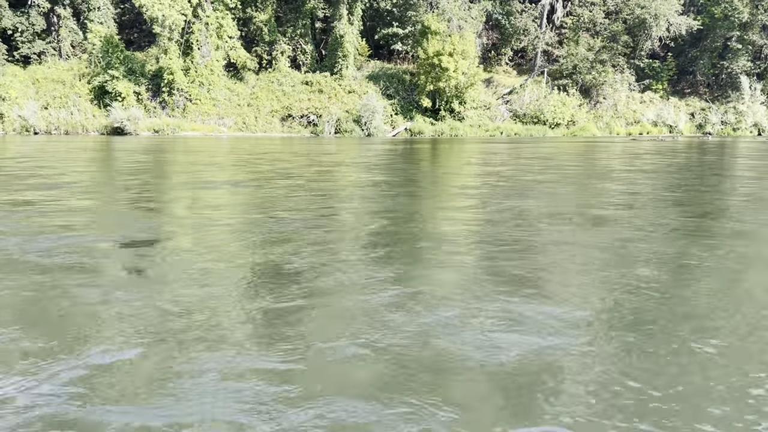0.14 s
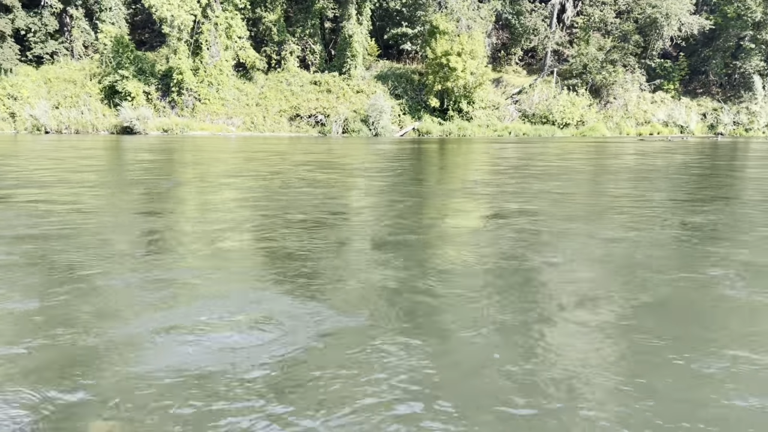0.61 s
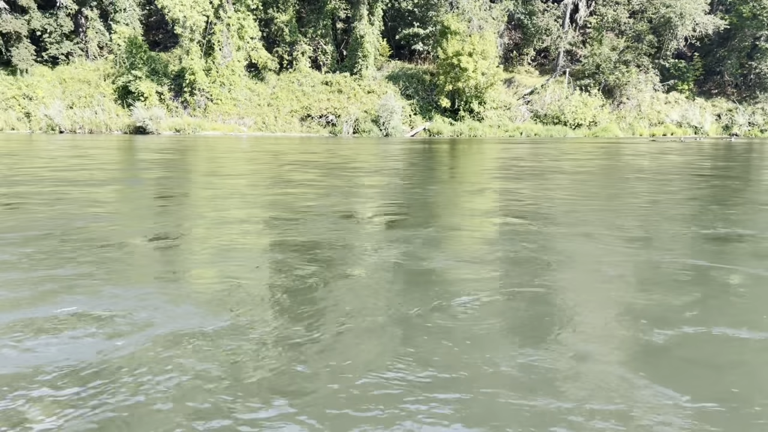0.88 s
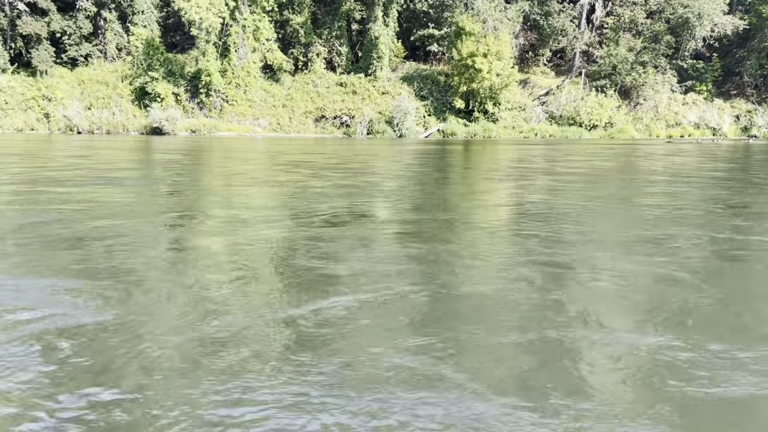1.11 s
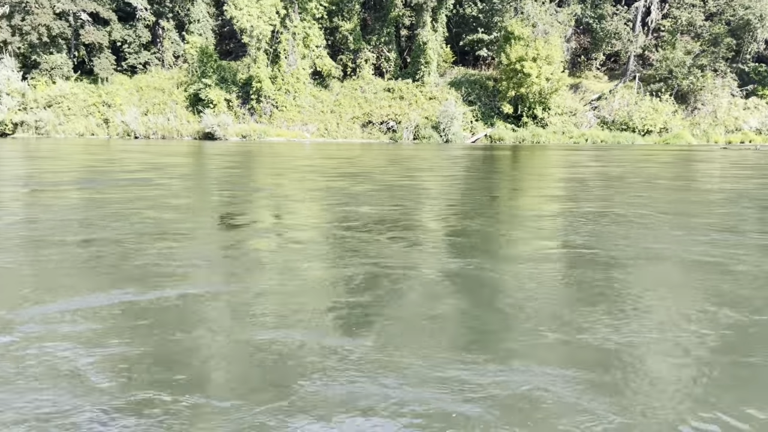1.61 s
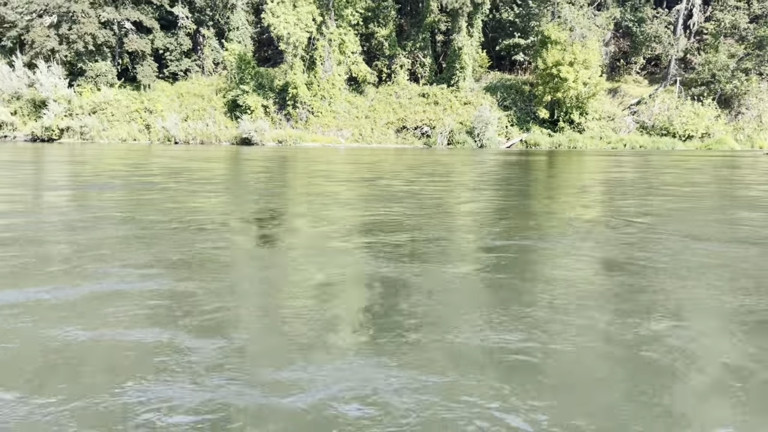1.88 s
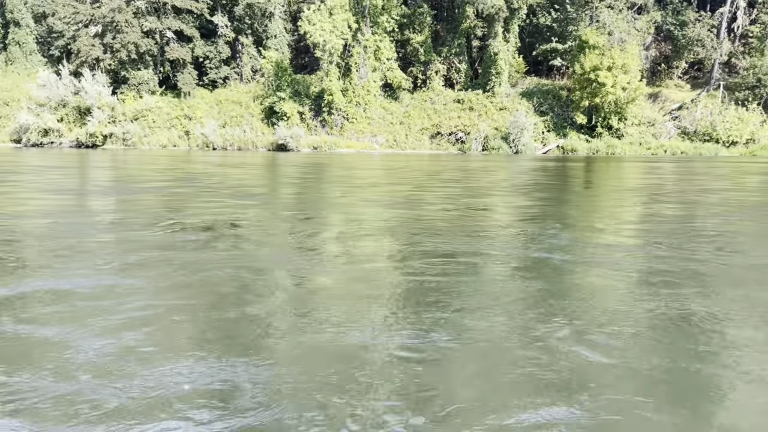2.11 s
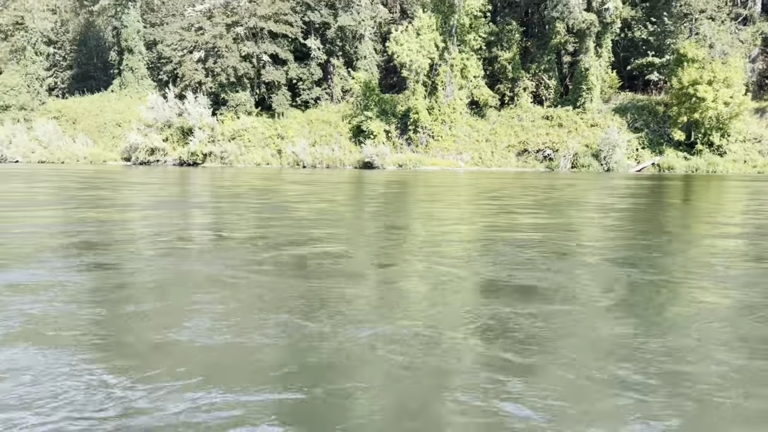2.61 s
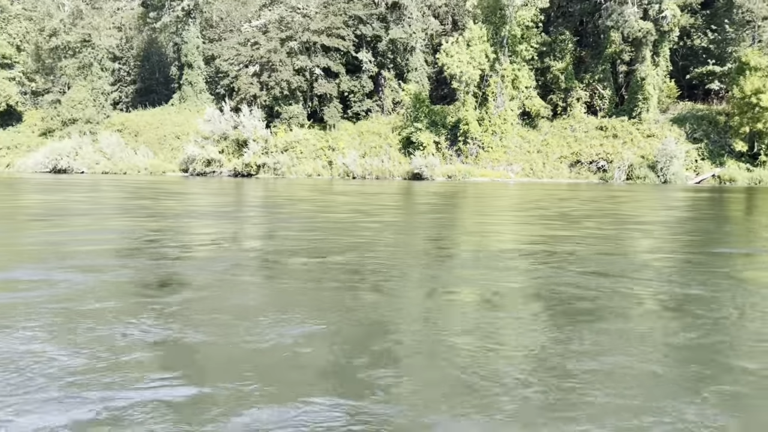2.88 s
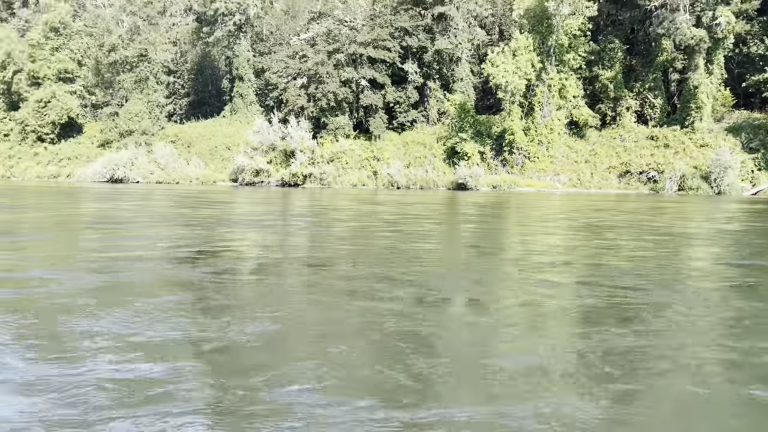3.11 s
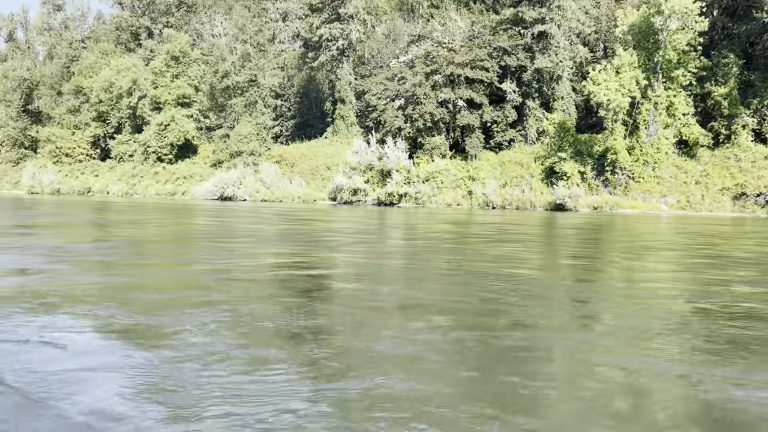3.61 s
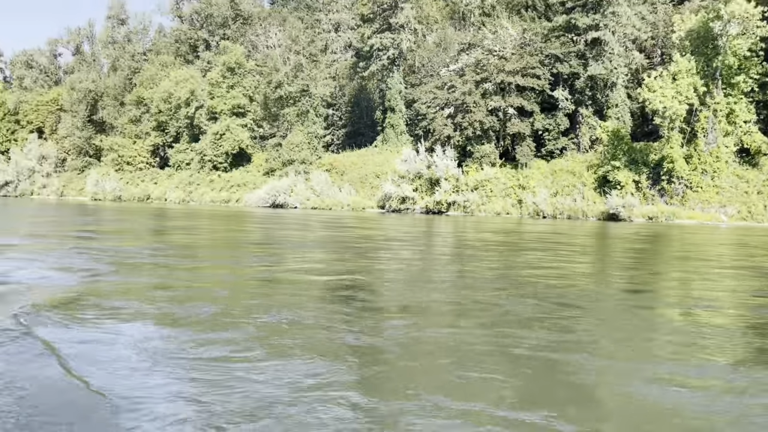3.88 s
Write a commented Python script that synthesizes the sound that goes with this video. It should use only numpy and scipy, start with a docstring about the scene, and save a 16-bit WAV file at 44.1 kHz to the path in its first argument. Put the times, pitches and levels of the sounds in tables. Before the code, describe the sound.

A small boat's outboard motor holds a deep, nearly constant drone for four seconds, its upper hum fluttering. A fine, rapid metallic rattle buzzes within it, clearest around 2.1-3 s. Soft, patchy water and engine wash continues underneath. Low wind gusts bump the microphones near 1.1 and 2 s, then harder from 2.9 to 3.6 s. Faint thin treble hiss swells after 2.5 s; a tiny dry tick lands near 3.7 s.

```python
"""On a small boat gliding along a river, an outboard motor drones steadily.
The motor hums as wavering sines on its shaft orders, and a metal part rattles once a turn as knocked resonances.
Gusts buffet the microphones as lumpy low noise with short pushes; water and engine wash is patchy broad noise.
Two narrow treble hisses are resonated noise that swells late, and tiny ticks are short clusters of rings."""
import sys
import numpy as np
from scipy import signal
from scipy.fft import rfft, irfft
from scipy.io import wavfile
from scipy.ndimage import uniform_filter1d

SR = 44100
rng = np.random.default_rng(int(sys.argv[2]) if len(sys.argv) > 2 else 0)


def attenuation_scalar(level_db):
    """Turn a level in dB into a linear amplitude multiplier (20 dB per decade)."""
    decades = np.asarray(level_db, float) / 20
    return 10 ** decades


def bounce(signal):
    """Save signal as a 16-bit WAV file at the path given by the first command-line argument."""
    frames = np.transpose(np.atleast_2d(signal))
    limited = np.clip(frames, -1, 1)
    pcm = np.round(limited * 32767).astype(np.int16)
    wavfile.write(sys.argv[1], SR, pcm)


N = 176400  # samples, 4 s
KNOCK_AT_TURN = 0.6  # point of the turn where the rattle knocks and the wash throbs highest


def evened(x):
    """Scales to rms 1."""
    return x / np.sqrt(np.mean(x ** 2) + 1e-20)


def curve(table, column=1):
    """Draws a table column as automation, one value per sample."""
    rows = np.array(table)
    return np.interp(np.arange(N) / SR, rows[:, 0], rows[:, column])


def read(table, hz, column=1):
    """Reads a table column on a log-frequency axis."""
    rows = np.array(table)
    return np.interp(np.log(hz + 1), np.log(rows[:, 0] + 1), rows[:, column])


def slow(top_hz):
    """Slow random drift, rolled off steeply around top_hz, rms 1."""
    hz = np.fft.rfftfreq(N, 1 / SR)
    lowpass = (hz > 0) / (1 + (hz / top_hz) ** 4)
    return evened(irfft(rfft(rng.standard_normal(N)) * lowpass, N))


def resonate(x, hz, width):
    """A one-pole resonance that follows hz, with gain 1 at its centre; gives an analytic signal."""
    carrier = np.exp(2j * np.pi * np.cumsum(hz * np.ones(len(x))) / SR)
    r = np.exp(-np.pi * width / SR)
    return 2 * carrier * signal.lfilter([1 - r], [1, -r], x / carrier)


def spread(ring, lead):
    """Scales an analytic sound to rms 1 and makes it stereo; left leads right by lead radians."""
    level = np.sqrt(np.mean(ring.real ** 2))
    turned = np.exp(0.5j * lead * np.array([[1], [-1]]))
    return (ring / level * turned).real


def bins(size):
    """Frequencies and two fields of complex noise for frames of this size."""
    a, b, c, d = rng.standard_normal((N * 4 // size + 8, size // 2 + 1, 4)).T
    return np.fft.rfftfreq(size, 1 / SR), a + 1j * b, c + 1j * d


def frames_to_sound(z, size):
    """Inverse short-time transform."""
    return signal.istft(z, nperseg=size, noverlap=size * 3 // 4)[1][..., :N]


# Motor speed: time_s, shaft_turns_per_s
SHAFT_SPEED = [(0, 53.2), (1.1, 53.1), (1.3, 52.8), (1.5, 53.3), (1.7, 53.25), (1.9, 52.9), (2.1, 52.95),
               (2.4, 52.7), (2.7, 52.6), (3.1, 52.9), (3.3, 53.3), (4, 53.5)]


def shaft():
    """Shaft position in turns: the running sum of its speed."""
    return np.cumsum(curve(SHAFT_SPEED)) / SR


# Engine orders: multiple of the shaft rate, rms_db before waver, waver_db, left_lead_rad, left_minus_right_db
SHAFT_ORDERS = [(1, -36.5, 3.5, .1, 8), (2, -14.5, 0.55, 0.24, 1.6), (3, -44.5, 0, 0.45, 11),
                (4, -21, 1.87, 0.45, 3), (5, -52.5, -8, 0.66, 20), (6, -35.5, 1.8, 0.61, -2),
                (7, -44, 2, 1.36, 7), (8, -44.5, 5.5, 0.85, -2), (9, -46, 0, 1.7, -1.5),
                (10, -51.5, 2.5, 1.6, 2), (12, -42.5, 1.1, 1.5, 10), (13, -43, 0.4, 1.8, 10),
                (15, -60.5, 5, 1.3, 3), (20, -52.5, 3.5, 2.1, -4)]
# Gain ride on the second firing order (shaft order 4): time_s, gain_db
SECOND_FIRING = [(0, -28), (.25, -5.5), (.45, -9), (.55, -10.5), (.85, -1), (1.15, 1.5), (1.25, -11.5),
                 (1.45, 1.5), (1.55, -6.5), (1.7, 0), (2.05, -4), (2.25, -1), (2.55, 3), (2.65, -4),
                 (2.85, -1.5), (3.25, -1.5), (3.45, -14.5), (3.65, -8.5), (3.75, 1.5), (4, 2)]


def hum(turns):
    """Wavering sines on the shaft orders, each reaching the two microphones differently."""
    waver_hz, wobble_turns, second_lag_rad = 9.0, 0.002, 0.54
    out = np.zeros((2, N))
    side = np.array([[0.5], [-0.5]])  # left, right
    for order, db, waver_db, lead, lean_db in SHAFT_ORDERS:
        level_db = db + waver_db * slow(waver_hz) + side * lean_db
        wobbly_turns = turns + wobble_turns * slow(waver_hz)
        start_turns = rng.random()
        phase = 2 * np.pi * order * wobbly_turns
        if order == 4:
            level_db = level_db + curve(SECOND_FIRING)
            phase = phase - second_lag_rad
        if order > 4:
            phase = phase + 2 * np.pi * start_turns
        # the cosine makes up for what the lead takes from the sum of the two sides
        out += np.sqrt(2) * attenuation_scalar(level_db) * np.cos(phase + side * lead) / np.cos(lead / 2)
    return out


# Rattle over time: time_s, level_db per microphone, ring_hz, left_lead_rad
RATTLE_COURSE = [(0, -39.5, 1954, -1.5), (1, -38, 1963, -1.7), (1.4, -39.5, 1983, -1.4),
                 (1.9, -37.5, 2030, -1.6), (2.15, -34, 2010, -1.6), (2.4, -33.5, 1976, -1.5),
                 (2.65, -34, 1980, -1.5), (2.9, -33.5, 1914, -1.86), (3.1, -35.5, 1830, -2),
                 (3.3, -38, 1880, -3), (3.6, -38, 1890, -3), (4, -43, 2000, -2.5)]
# Resonances of the metal part: ratio to the main ring, width_hz, relative_db
METAL_RINGS = [(1, 102, 0.5), (0.9, 120, -8.5), (1.19, 110, -12.5), (0.513, 113, -11.5)]


def rattle(turns):
    """One short knock a turn rings a loose metal part, which also shakes faintly in between."""
    jitter_s, spread_db, burst_s = 0.00012, 2.2, 0.002
    burst_share, shake_share = 0.1, 0.22
    at = np.flatnonzero(np.diff(np.floor(turns - KNOCK_AT_TURN)))
    chance = rng.standard_normal((len(at), 2))
    jitter = np.round(chance[:, 0] * jitter_s * SR).astype(int)
    knocks = np.zeros(N)
    knocks[np.clip(at + jitter, 0, N - 1)] = attenuation_scalar(spread_db * chance[:, 1])

    decay = np.exp(-np.arange(400) / SR / burst_s)
    bursts = signal.oaconvolve(knocks, decay)[:N] * rng.standard_normal(N)
    shake = rng.standard_normal(N)
    drive = evened(knocks) + burst_share * evened(bursts) + shake_share * shake

    main_hz, lead = curve(RATTLE_COURSE, column=2), curve(RATTLE_COURSE, column=3)
    ring = np.zeros((2, N))
    for ratio, width, db in METAL_RINGS:
        narrow = resonate(drive, ratio * main_hz, width).real
        smoothed = resonate(narrow, ratio * main_hz, 3 * width)
        ring += attenuation_scalar(db) * spread(smoothed, ratio ** 2 * lead)
    return evened(ring) * attenuation_scalar(curve(RATTLE_COURSE))


# Gusts: time_s, level_db before the lift
GUSTS = [(0, -25.5), (.15, -32), (.25, -29.5), (.5, -33), (1.05, -30), (1.15, -19.5), (1.27, -24.5),
         (1.4, -32), (1.75, -27), (1.95, -20.5), (2.05, -24.5), (2.15, -22), (2.3, -27), (2.6, -30),
         (2.75, -23.5), (3.03, -16.5), (3.22, -27), (3.35, -14.5), (3.55, -13), (3.65, -22.5),
         (3.75, -18.5), (3.85, -26.5), (4, -22)]
# Tone of the wind: freq_hz, relative_db
WIND_TONE = [(25, -48), (38, -46), (55, 0.5), (90, 3), (150, -3), (250, -9.5), (400, -20), (700, -42),
             (1200, -90)]
# Strong buffets, each a short low push: time_s of the centre, peak_db, pitch_hz, length_s from centre to 1/e
PUSHES = [(1.135, -17, 110, .008), (2.888, -15, 400, .0022), (2.9, -18, 320, .005), (3.0, -13, 170, .004),
          (3.278, -13, 200, .004), (3.289, -5, 280, .0018), (3.335, -12, 160, .004), (3.49, -15, 300, .005)]


def wind():
    """Lumpy low rumble at the microphone ports, plus a few strong buffets."""
    lift_db, same, lumps_db, lumps_hz = 1.43, 0.85, 3.2, 27.6  # same: what both microphones share
    hz, a, b = bins(size=2048)
    left_right = np.array([a, same * a + np.sqrt(1 - same ** 2) * b])
    rumble = frames_to_sound(left_right * attenuation_scalar(read(WIND_TONE, hz))[:, None], size=2048)
    out = evened(rumble) * attenuation_scalar(curve(GUSTS) + lift_db + lumps_db * slow(lumps_hz))
    for centre_s, db, pitch_hz, length in PUSHES:
        t = np.arange(N) / SR - centre_s
        offset_turns = 0.029 * rng.standard_normal((2, 1))  # differs per microphone
        out += attenuation_scalar(db) * np.cos(2 * np.pi * (pitch_hz * t + offset_turns)) * np.exp(-(t / length) ** 2)
    return out


# Tone of the wash, sum of the microphones: freq_hz, relative_db per Hz
MID_TONE = [(100, -23), (160, 6.5), (300, -1.5), (430, -4.5), (590, -9), (660, -6.5), (870, -11),
            (1140, -13.5), (1560, -18), (2000, -15.5), (2400, -17.5), (2660, -24.5), (4300, -27),
            (5600, -33), (6500, -31.5), (8100, -39), (8800, -42.5), (9600, -35.5), (12200, -29.5),
            (14000, -43), (15600, -40)]
# Tone of the wash, difference of the microphones: freq_hz, relative_db per Hz
SIDE_TONE = [(100, -1), (200, -4), (360, -4.5), (465, -8.5), (670, -1.5), (850, -11), (1030, -11),
             (1400, -14.5), (1900, -10.5), (2600, -32.5), (3300, -20.5), (4200, -30), (4600, -30),
             (6600, -34), (8500, -27.5), (12200, -33), (15500, -82)]
# How far the difference follows the sum: freq_hz, quarter_turn_share, in_step_share
SIDE_LINK = [(250, 0.57, 0.18), (650, .6, 0.46), (1100, 0.19, 0.3), (2000, -.4, 0.058), (3300, .1, .01),
             (6500, -.26, 0.053), (8500, .2, .01), (11000, .64, .01), (14000, .1, .01)]


def wash(turns):
    """Patchy broad noise of water and engine that throbs a little with each turn."""
    mid_db, side_db, patch_db = -28, -30, 1.5
    swell_db, swell_hz, throb_depth = 0.2, 2.0, 0.056
    hz, a, b = bins(size=1024)
    blurred = uniform_filter1d(rng.standard_normal(a.T.shape), 10, 0)  # over frames
    patches = evened(uniform_filter1d(blurred, 12, 1)).T  # over bins
    in_step = np.clip(read(SIDE_LINK, hz, column=2), -0.3, 0.3)
    quarter_turn = np.clip(read(SIDE_LINK, hz), -0.9, 0.9)
    link = (in_step + 1j * quarter_turn)[:, None]

    mid = a * attenuation_scalar(read(MID_TONE, hz))[:, None]
    side = (link * a + np.sqrt(1 - abs(link) ** 2) * b) * attenuation_scalar(read(SIDE_TONE, hz))[:, None]
    mid, side = frames_to_sound(np.array([mid, side]) * attenuation_scalar(patch_db * patches), size=1024)
    mid, side = attenuation_scalar(mid_db) * evened(mid), attenuation_scalar(side_db) * evened(side)
    throb = 1 + throb_depth * np.cos(2 * np.pi * (turns - KNOCK_AT_TURN))
    return np.array([mid + side, mid - side]) * throb * attenuation_scalar(swell_db * slow(swell_hz))


# Hiss over time: time_s, lower_band_db, upper_band_db
HISS_LEVELS = [(0, -70, -59), (2.1, -68, -66), (2.55, -59, -58), (2.95, -50, -51), (3.2, -52, -58),
               (3.45, -51, -54.5), (3.65, -45.5, -61), (3.8, -63, -58.5), (4, -68, -64)]
# The two bands, lower then upper: pitch_hz, width_hz, left_lead_rad
HISS_TONES = [(3240, 55, 1.7), (4780, 160, .4)]


def hisses():
    """Two narrow treble bands of noise, each resonated twice and ridden on its own level."""
    out = np.zeros((2, N))
    for k, (hz, width, lead) in enumerate(HISS_TONES):
        narrow = resonate(rng.standard_normal(N), hz, width).real
        band = spread(resonate(narrow, hz, 2 * width), lead)
        out += band * attenuation_scalar(curve(HISS_LEVELS, column=k + 1))
    return out


# Small ticks near the microphones: time_s of the peak, level_db, rise_s, tilt_db per kHz around 4.5 kHz
TICK_HITS = [(.04, -38, .0012, 6), (3.6835, -25.5, .0011, .1)]
# What a tick rings with: pitch_hz, decay_per_s, left_db, right_db (relative to the tick's level)
TICK_TONES = [(2300, 1300, 0, 0), (3300, 1500, -5, -5), (4200, 1100, 0, 2), (4950, 1200, -2, -2),
              (5600, 1500, -8, -12), (6400, 1300, -2, -18), (8500, 1200, -26, -26)]


def ticks():
    """Tiny dry ticks: a few wide rings that swell together and each die off quickly at their own rate."""
    out, t = np.zeros((2, N)), np.arange(N) / SR
    right_lead_turns = 0.2 * np.array([[0], [1]])
    for peak_s, db, rise, tilt_db in TICK_HITS:
        since = t - peak_s
        for hz, decay, *ears_db in TICK_TONES:
            envelope = np.exp(-np.where(since < 0, (since / rise) ** 2, decay * since))
            ring = np.cos(2 * np.pi * (hz * t + rng.random() + right_lead_turns))
            level_db = db + np.array(ears_db)[:, None] + tilt_db * (hz - 4500) / 1000
            out += attenuation_scalar(level_db) * envelope * ring
    return out


def scene():
    """Motor, rattle, wind, wash, hisses and ticks together."""
    turns = shaft()
    return hum(turns) + rattle(turns) + wind() + wash(turns) + hisses() + ticks()


def band_limit(x):
    """A steep low-pass at the top of the band."""
    return signal.sosfilt(signal.butter(12, 15630, fs=SR, output="sos"), x)


def record(dry):
    """A soft knee rounds off the highest peaks of the mix."""
    knee, ceiling = 0.7, 0.97  # of full scale
    room = ceiling - knee
    over = np.maximum(abs(dry) - knee, 0)
    finished = np.sign(dry) * (np.minimum(abs(dry), knee) + room * np.tanh(over / room))
    return band_limit(finished)


dry = scene()
out = record(dry)
bounce(out)
```